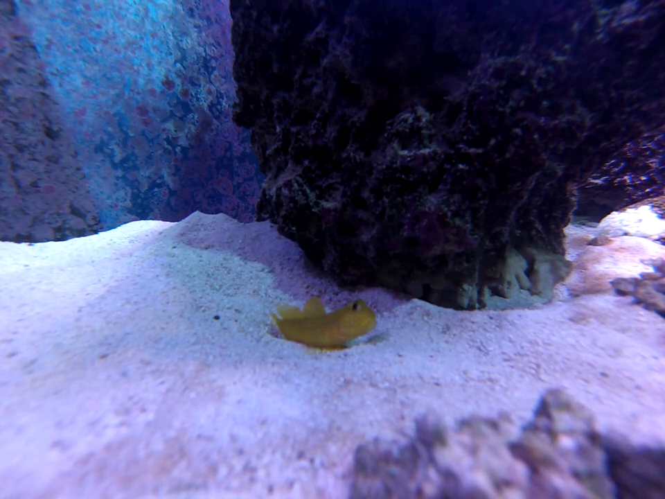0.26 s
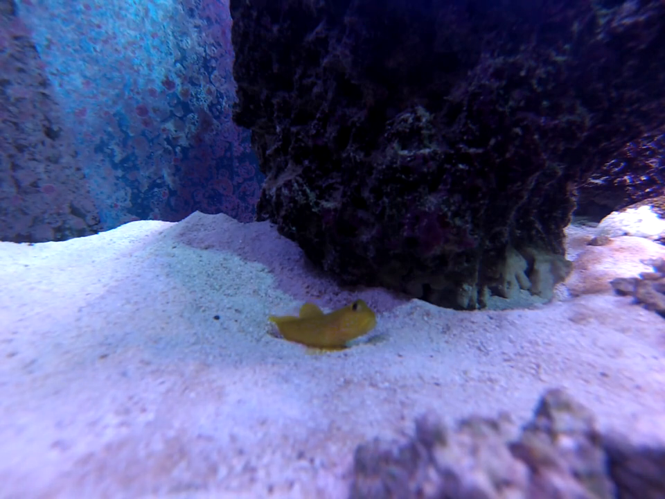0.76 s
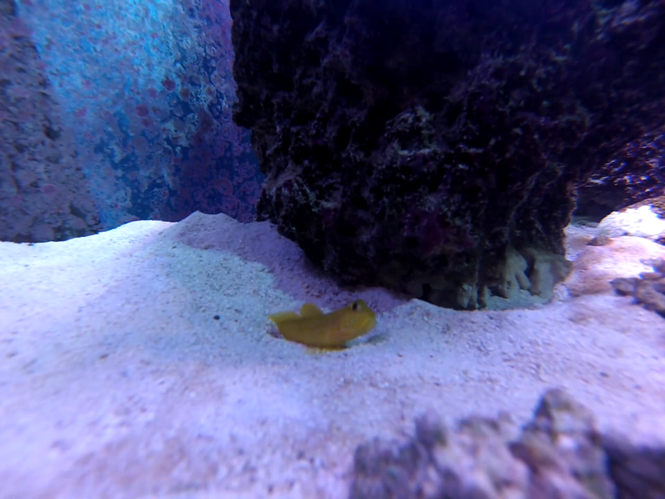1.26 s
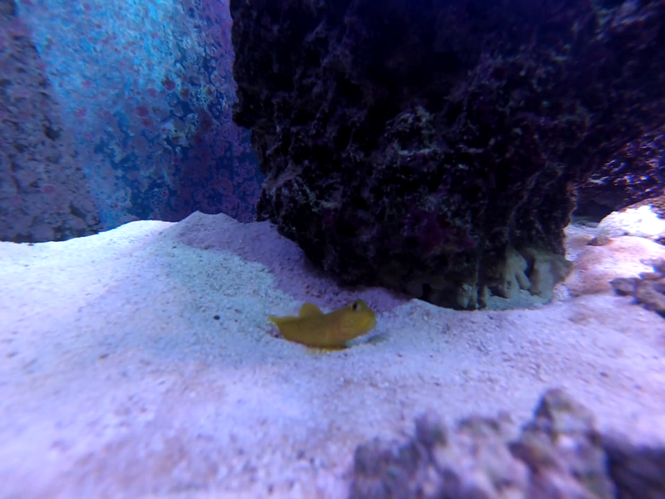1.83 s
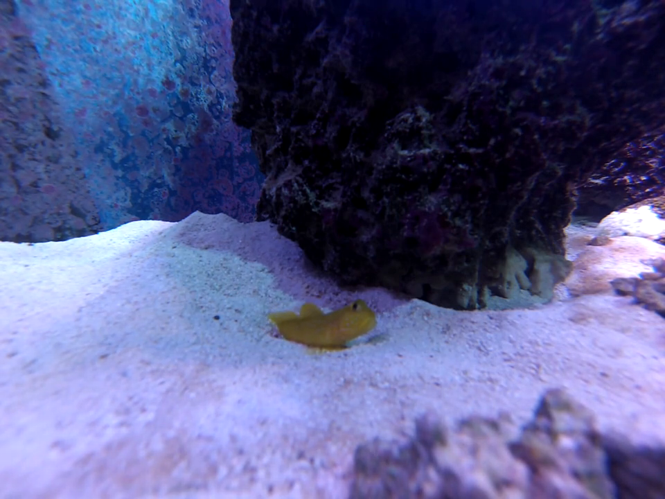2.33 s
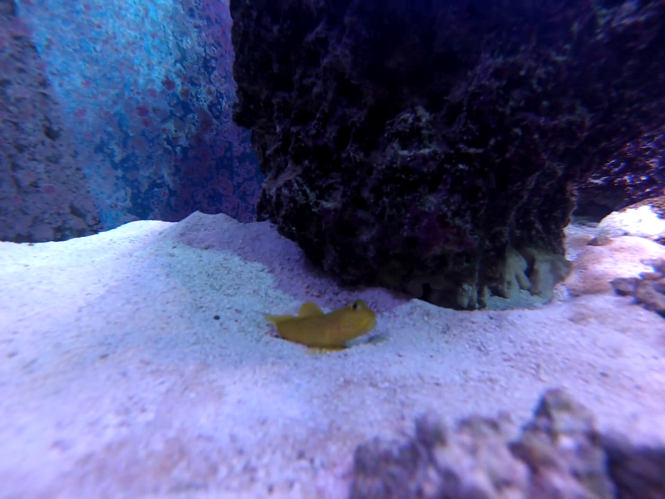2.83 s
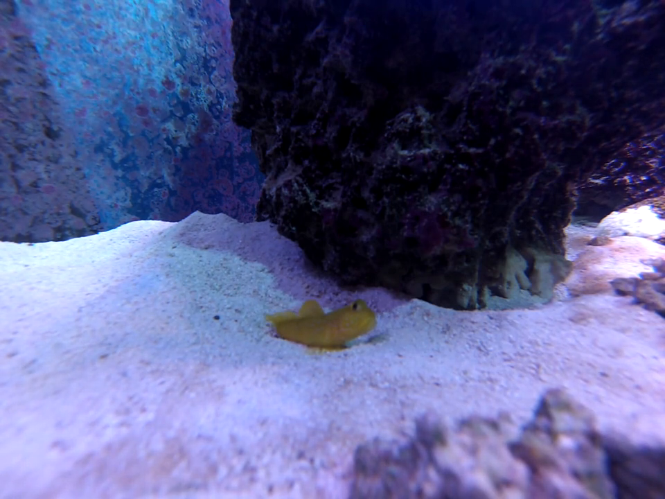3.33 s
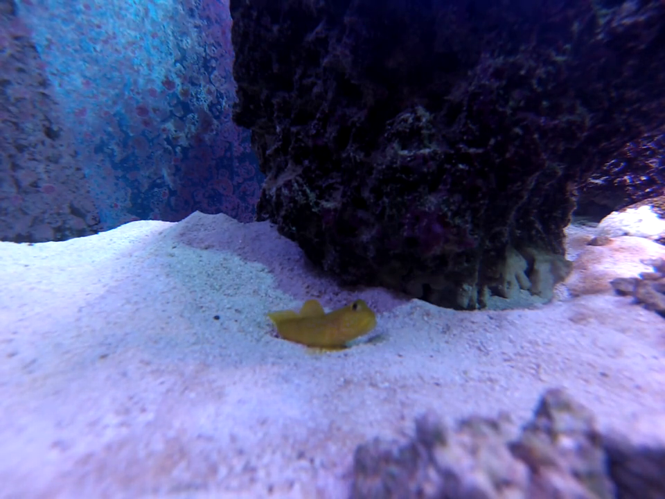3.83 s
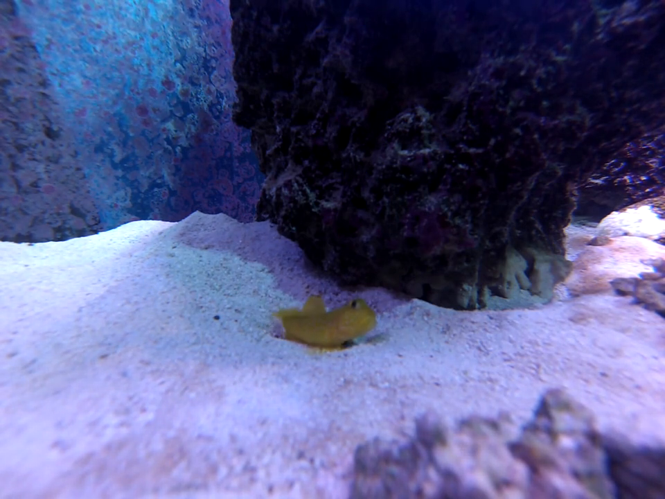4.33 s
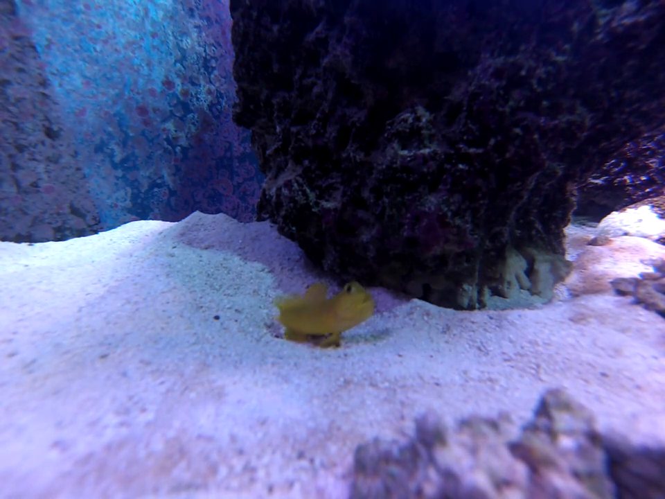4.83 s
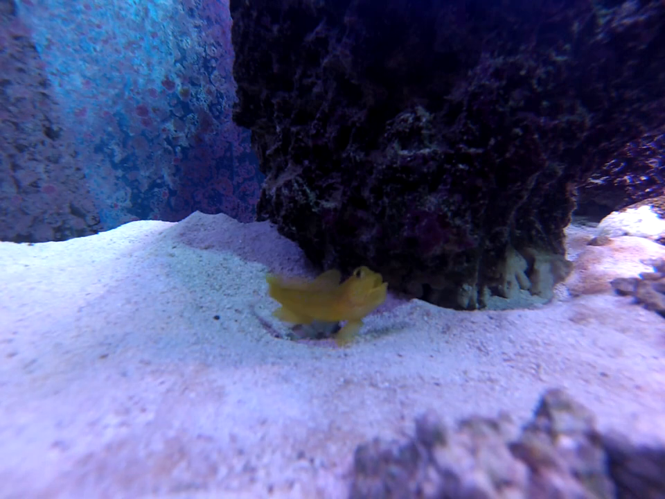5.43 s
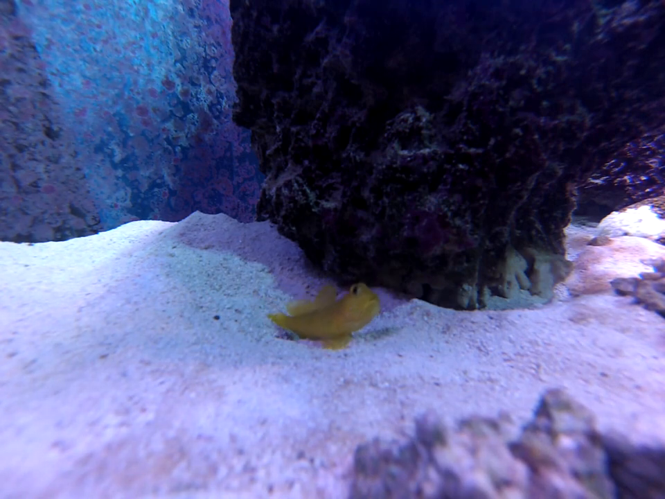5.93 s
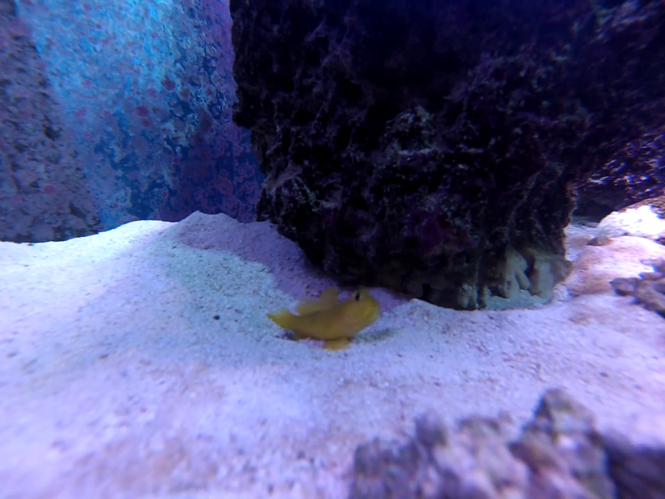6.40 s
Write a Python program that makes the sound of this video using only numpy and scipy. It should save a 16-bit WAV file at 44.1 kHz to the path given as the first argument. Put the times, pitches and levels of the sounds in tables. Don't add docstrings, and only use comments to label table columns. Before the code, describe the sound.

Deep, constant mains-like buzz of aquarium pumps through water, with wavering low rumble, tiny clicks and a faint hiss underneath.

```python
import sys
import numpy as np
from scipy import signal
from scipy.fft import rfft, irfft
from scipy.io import wavfile

SR = 44100
rng = np.random.default_rng(int(sys.argv[2]) if len(sys.argv) > 2 else 0)


def makeup_ratio(level_db):
    decades = np.asarray(level_db, float) / 20
    return 10 ** decades


def master(y):
    cut = np.clip(np.atleast_2d(y).T, -1, 1)
    pcm = np.round(cut * 32767)
    wavfile.write(sys.argv[1], SR, pcm.astype(np.int16))


N = 293706

# (time [s], tick level [dB])
GAIN_STEPS = [(0.3826, -45), (0.4659, -46), (0.9268, -54), (1.1329, -52), (1.1743, -55), (1.2491, -47),
              (1.6153, -46), (1.8487, -48), (1.9326, -47), (1.9824, -48), (2.0817, -46), (2.2653, -46),
              (2.5322, -49), (2.7816, -44), (2.8485, -47), (3.6816, -49), (3.7315, -49), (3.8148, -48),
              (3.9814, -46), (4.3481, -51), (4.4643, -49), (4.9138, -47), (4.9307, -47), (5.6087, -53),
              (5.7978, -49), (5.8302, -49), (6.3505, -54), (6.4633, -46), (6.4967, -48), (6.6305, -49)]


def rms_one(x):
    return x / np.sqrt(np.mean(x ** 2) + 1e-20)


def in_time(rows):
    s, *columns = np.transpose(rows)
    return [np.interp(np.arange(N) / SR, s, column) for column in columns]


def drift(rate_hz):
    r = np.exp(-2 * np.pi * rate_hz / SR)
    noise = rng.standard_normal(N + SR)
    settled = signal.lfilter([1], [1, -2 * r, r * r], noise)[SR:]
    return rms_one(settled)


def coloured(spectrum, modes=()):
    hz = np.arange(N // 2 + 1) * SR / N + .01
    points = np.array(spectrum)
    level_db = np.interp(np.log(hz), np.log(points[:, 0]), points[:, 1])
    for centre_hz, width_hz, peak_db in modes:
        level_db += peak_db / (1 + (2 * (hz - centre_hz) / width_hz) ** 2)
    return rms_one(irfft(rfft(rng.standard_normal(N)) * makeup_ratio(level_db), N))


def resonate(x, hz, width_hz):
    r = np.exp(-np.pi * width_hz / SR)
    poles = [1, -2 * r * np.cos(2 * np.pi * hz / SR), r * r]
    return signal.lfilter([1, 0, -1], poles, x) * (1 - r * r) / 2


def hum(turns):
    # (multiple of the mains, rms level [dB], signed weight: it flips above the main tank resonance)
    overtones = [(1, -38.5, 0.99), (2, -21.0, 1), (3, -30, 0.94), (4, -22.5, 0.97), (5, -47.5, -0.31),
                 (6, -40, -1.03), (7, -58.5, 0.083), (8, -52.5, -1.4), (9, -55.5, -1.3), (10, -58.5, 0.91),
                 (12, -57, -0.89), (13, -66, 1), (14, -70.5, 0.44), (15, -66, -1), (17, -72.5, -0.72)]
    # (time [s], hum level [dB])
    load = [(0.05, -21), (1.45, -21), (2.16, -20), (2.75, -20.5), (3.97, -20.5), (4.21, -21), (6.51, -20.5),
            (6.6, -21.5)]
    load_db, = in_time(load)
    mix = np.zeros(N)
    for multiple, rms_db, weight in overtones:
        tone = weight * makeup_ratio(rms_db) * np.cos(2 * np.pi * multiple * turns)
        if multiple > 4:
            tone *= makeup_ratio(3.0 * drift(rate_hz=5.7))
        mix += tone
    return np.sqrt(2) * mix * makeup_ratio(load_db - load_db.mean())


def flow():
    # (frequency [Hz], density [dB per Hz])
    rumble_spectrum = [(7, -27), (22, -20), (36, -2.5), (120, -3), (200, -1.5), (300, -7), (480, -10.5),
                       (600, -18.5), (850, -27), (1050, -32.5), (1250, -39.5), (1400, -39.5), (2500, -48.5),
                       (5000, -78.5)]
    # (centre [Hz], width [Hz], height [dB])
    tank_modes = [(11.4, 2.5, 14.5), (32.4, 7, 11), (48, 11, -1), (69, 8.9, -4), (86, 14, 6),
                  (94.3, 8.6, -6), (106.5, 8.2, 4.5), (124, 6.2, -15), (152.5, 12, 7), (183.9, 12, 9),
                  (241.3, 9.9, 8.5), (316, 8.4, -2), (370.3, 13, 4.5), (444.6, 25, 5), (576, 59, -5),
                  (650, 87, 4), (710, 28, -1), (778.4, 44, 6.5), (955, 52, 8), (1020, 30, -5),
                  (1280, 130, -12.5), (510, 24, 4), (276, 63, 1.5)]
    # (time [s], swell of the lows [dB], length [s])
    surges = [
        (0.37, 2.5, .1),
        (0.651, 2, .08),
        (1.3, 1.5, .12),
        (2.74, 4.5, .1),
        (3.36, 8.5, 0.06),
        (5.402, -5.5, 0.088),
    ]
    t = np.arange(N) / SR
    surge_db = 0.5 * drift(rate_hz=3.6)
    for s, swell_db, length_s in surges:
        surge_db += swell_db * np.exp(-((t - s) / length_s) ** 2)
    rumble = makeup_ratio(-26.5) * coloured(rumble_spectrum, tank_modes)
    lowpass = signal.butter(2, 105, fs=SR, output="sos")
    lows = signal.sosfiltfilt(lowpass, rumble)
    rush = (rumble - lows) * makeup_ratio(0.4 * drift(rate_hz=4.0))
    return lows * makeup_ratio(surge_db) + rush


def housing(turns):
    # (time [s], level [dB])
    grit = [(0.05, -49.5), (0.43, -47.5), (0.74, -50.5), (1.91, -50), (2.49, -53), (2.62, -50), (3.72, -50),
            (3.75, -46.5), (3.81, -51.5), (4.13, -48), (5.01, -51), (5.03, -50), (6.56, -50.5), (6.6, -51)]
    # (mode [Hz], width [Hz], level [dB], rate [ticks per s], unevenness [dB])
    housing_modes = [(1050, 120, -4, 730, 4), (1198, 91, -0.5, 1000, 4), (1456, 96, -8.5, 1900, 8.5),
                     (1583, 69, -3.5, 620, 1.5), (1789, 78, -7.5, 960, 1), (2022, 130, -0.5, 1300, 3.5),
                     (2235, 90, -7.5, 900, 7.5), (2418, 130, -8, 990, 4), (2624, 120, -10, 980, 3.5),
                     (3020, 150, -21, 900, 4), (3320, 130, -30, 1200, 2), (3550, 200, -23, 580, 2),
                     (3760, 200, -20, 330, 3.5), (7100, 370, -32, 400, 3.5), (9900, 220, -38.5, 900, 1.5)]
    # (centre [Hz], width [Hz], share removed [0-1])
    mode_nulls = [(1306, 40, .5), (1870, 37, 0.61)]
    cover_above_hz, inlet_below_hz = 3400, 1300
    gust_hz = 7.1
    level_db, = in_time(grit)
    cover_db = level_db + 1.5 * drift(gust_hz)
    inlet_db = level_db + 1.4 * drift(gust_hz)
    together = drift(rate_hz=19.0)
    out = np.zeros(N)
    for hz, width_hz, db, per_s, uneven_db in housing_modes:
        crowding = 1 - 0.24 * np.cos(4 * np.pi * turns) * min(hz / 6000, 1)
        born = rng.random(N) < per_s * crowding / SR
        sizes = makeup_ratio(uneven_db * np.minimum(rng.exponential(1, N), 5))
        polarity = rng.choice([-1, 1], N)
        ticks = rms_one(born * sizes * polarity)
        ticks *= makeup_ratio(together + 1.2 * drift(rate_hz=9.6))
        if hz > cover_above_hz:
            part_db = cover_db
        elif hz < inlet_below_hz:
            part_db = inlet_db
        else:
            part_db = level_db
        ticks *= makeup_ratio(part_db - part_db.mean())
        inside = resonate(ticks, hz, 1.5 * width_hz)
        out += makeup_ratio(db) * resonate(inside, hz, 1.5 * width_hz)
    for hz, width_hz, share in mode_nulls:
        out -= share * resonate(out, hz, width_hz)
    return makeup_ratio(-49.5) * rms_one(out)


def gulps():
    pulse_hz, pulse_s, lag_s = 172, .006, .0009
    half = 1000
    t = np.arange(-half, half) / SR
    pulse = np.cos(2 * np.pi * pulse_hz * t) * np.exp(-(t / pulse_s) ** 2)
    out = np.zeros(N + SR)
    for s, tick_db in GAIN_STEPS:
        start = round((s + lag_s) * SR) - half
        gulp_db = -23 + 0.7 * (tick_db + 48)
        out[start:start + len(t)] += makeup_ratio(gulp_db) * pulse
    return out[:N]


def scene():
    # (time [s], frequency [Hz])
    mains = [(0, 60.014), (2.2, 60.021), (3.5, 60.031), (6.7, 60.029)]
    crest_lag_s = .0002
    mains_hz, = in_time(mains)
    turns = np.cumsum(mains_hz) / SR - crest_lag_s * mains_hz
    mix = hum(turns) + flow() + housing(turns) + gulps()
    return mix[None]


def roll_off(x):
    return signal.sosfilt(signal.butter(12, 15290, fs=SR, output="sos"), x)


def record(dry):
    # (frequency [Hz], density [dB per Hz])
    hiss_spectrum = [(500, -7.5), (2800, 7), (4200, 4), (5500, 1.5), (8000, -1), (11000, -1.5),
                     (13000, -6.5), (15300, -7.5), (22050, -8.5)]
    step_lag_s, recovery_s = .0015, .1
    drops = np.zeros(N)
    for s, tick_db in GAIN_STEPS:
        at = round((s + step_lag_s) * SR)
        drops[at] = makeup_ratio(tick_db + 9.5) / max(abs(dry[0, at]), .12)
    lost = signal.lfilter([1], [1, -np.exp(-1 / (recovery_s * SR))], drops)
    gain = 1 + lost.mean() - lost
    hiss = makeup_ratio(-66.5) * coloured(hiss_spectrum)
    return roll_off((dry + hiss) * gain)


dry = scene()
out = record(dry)
master(out)
```